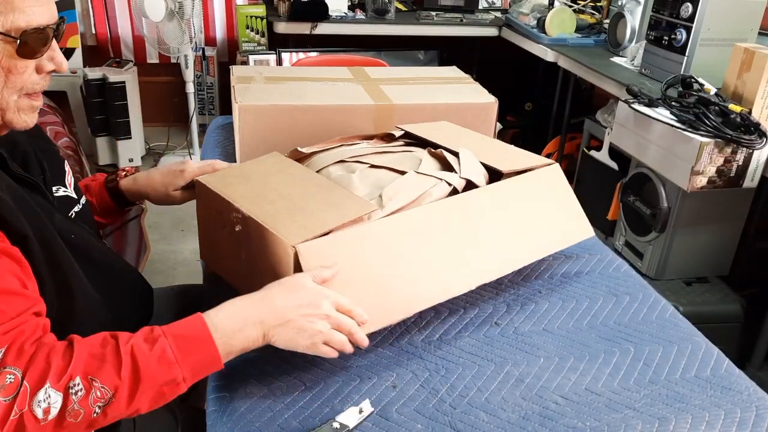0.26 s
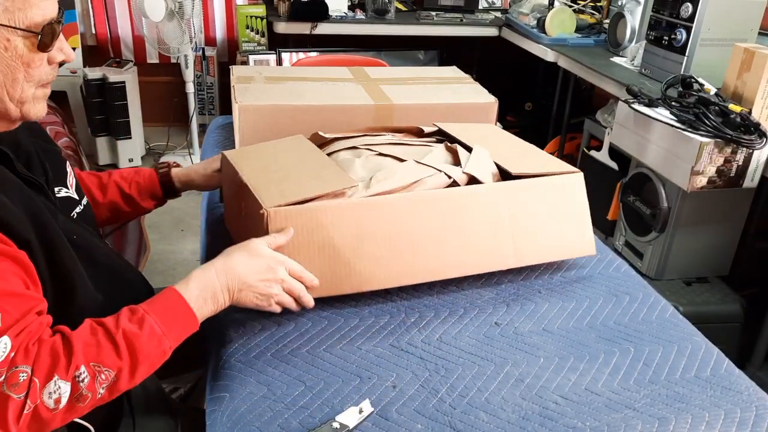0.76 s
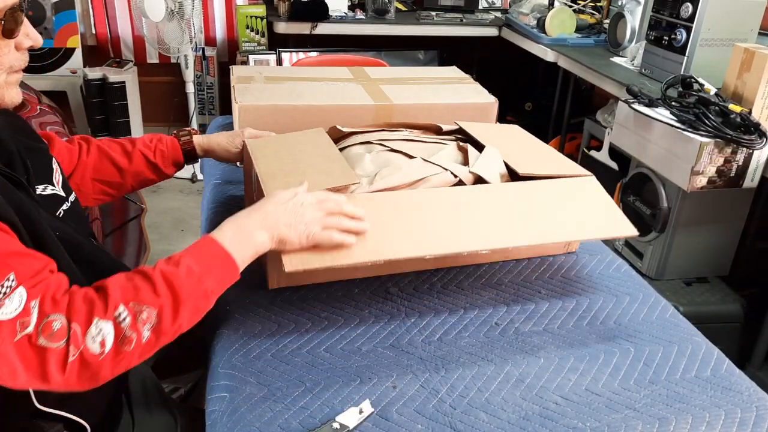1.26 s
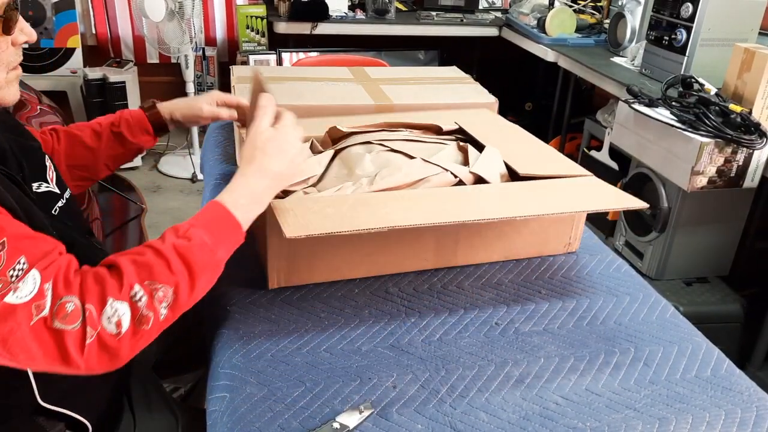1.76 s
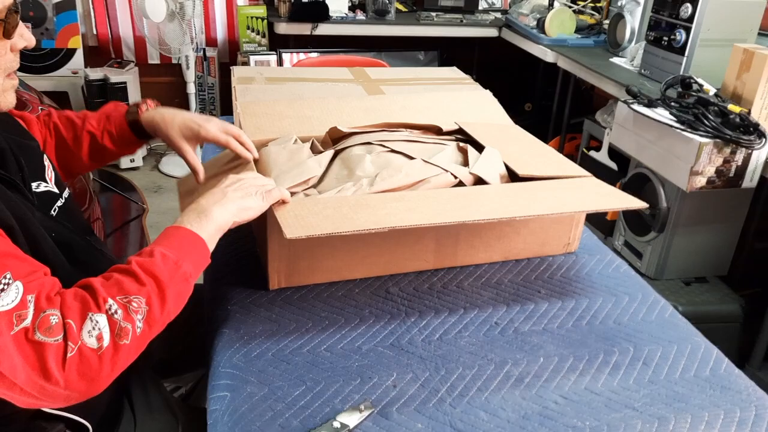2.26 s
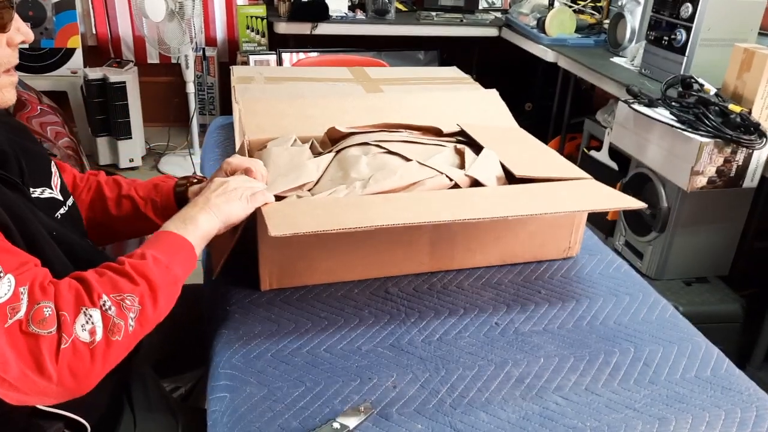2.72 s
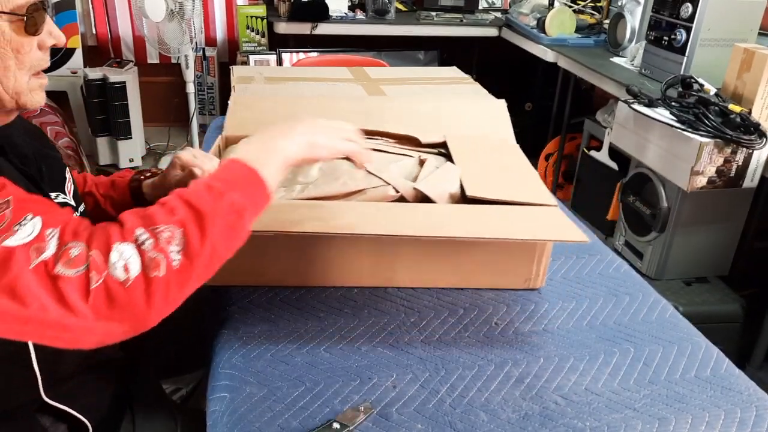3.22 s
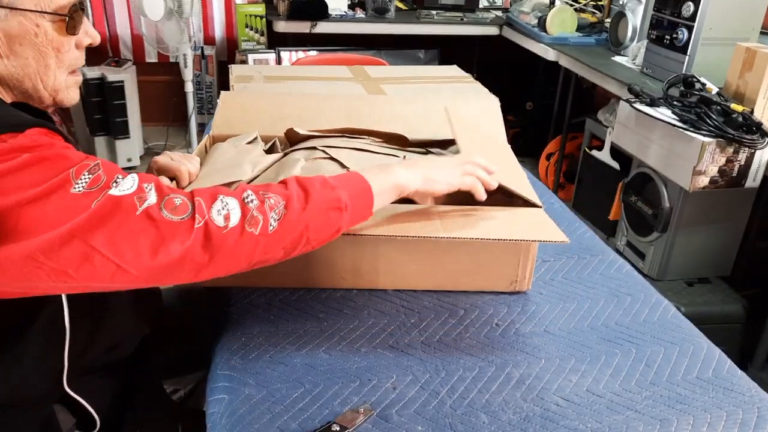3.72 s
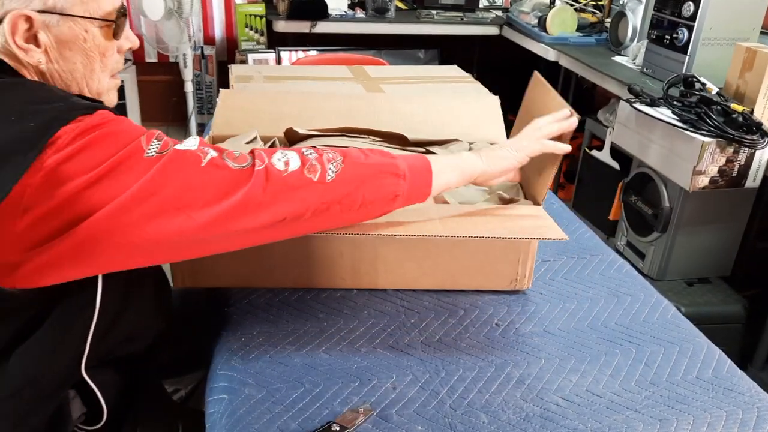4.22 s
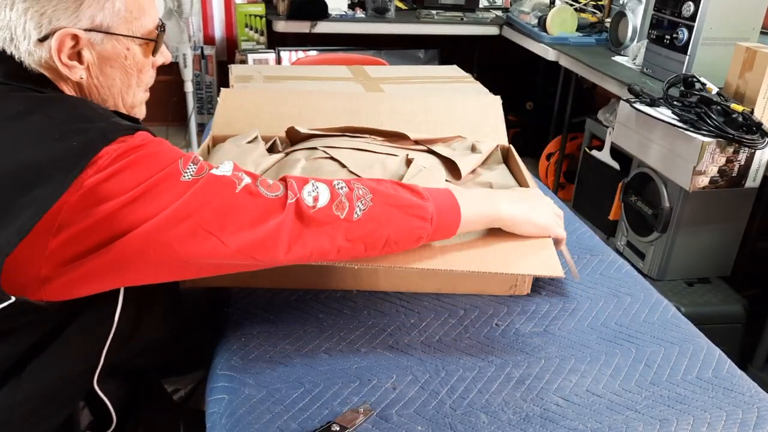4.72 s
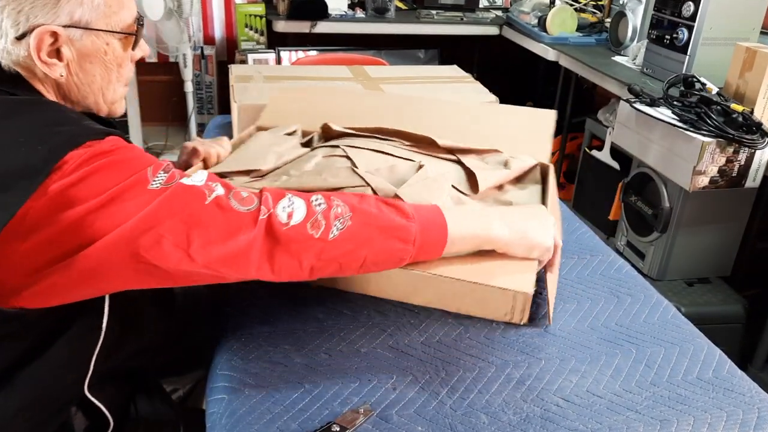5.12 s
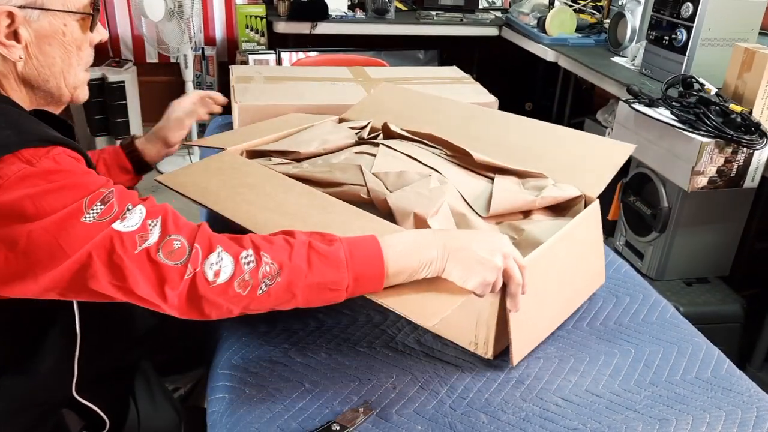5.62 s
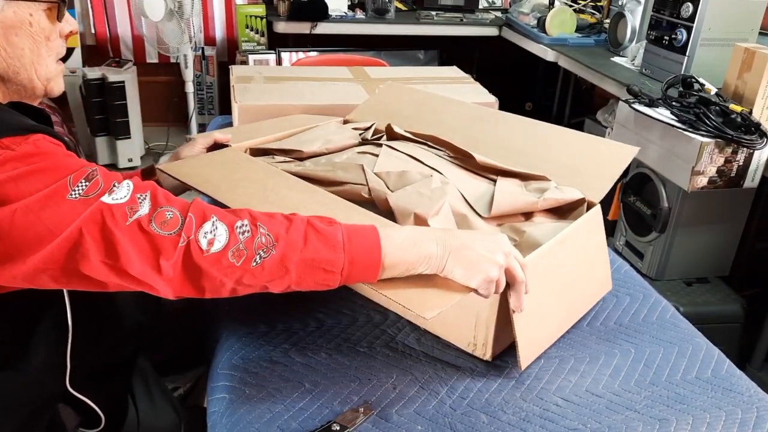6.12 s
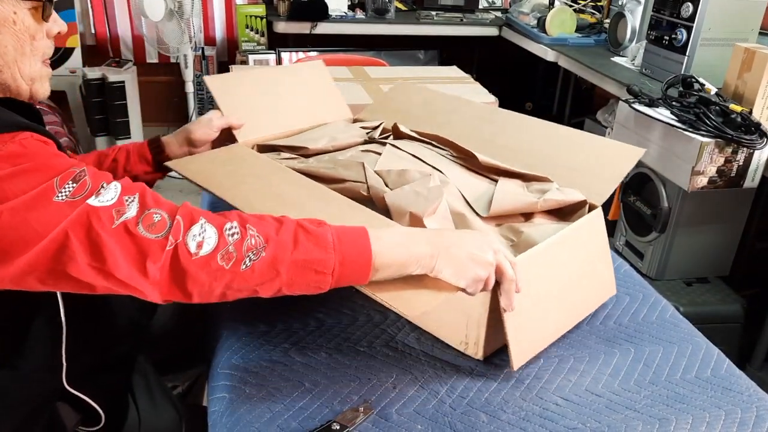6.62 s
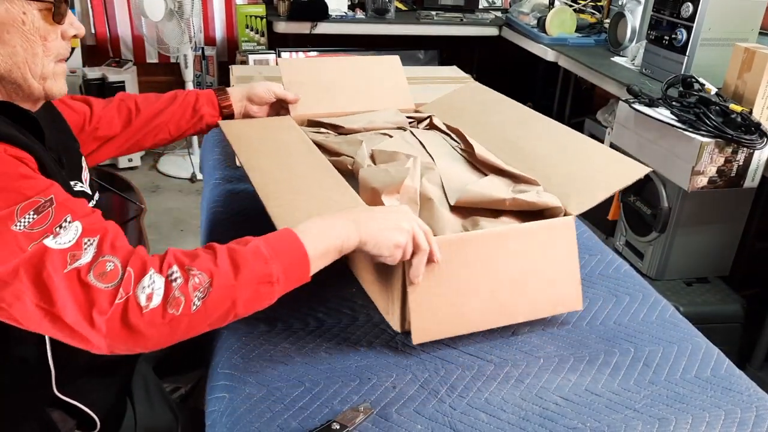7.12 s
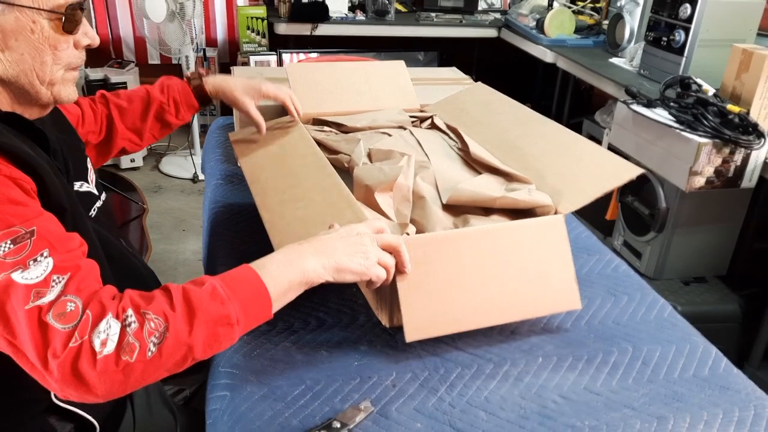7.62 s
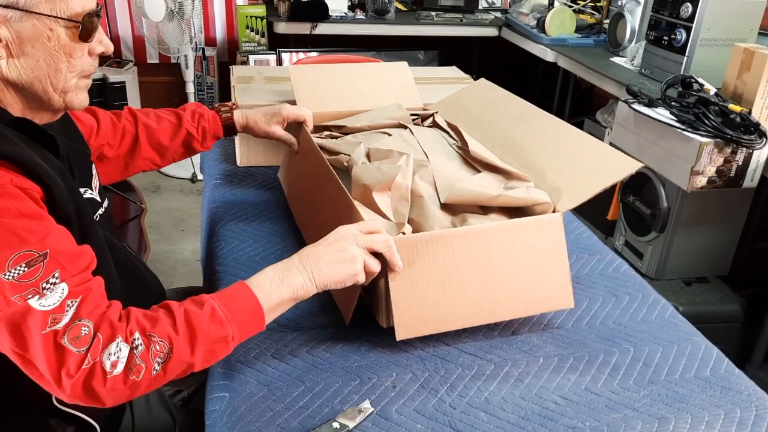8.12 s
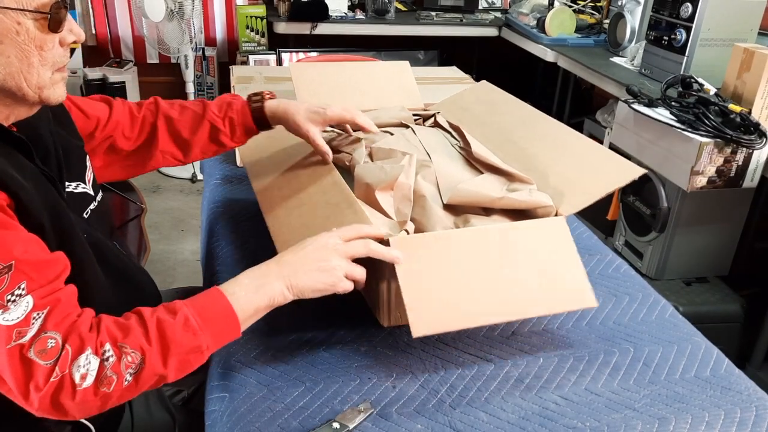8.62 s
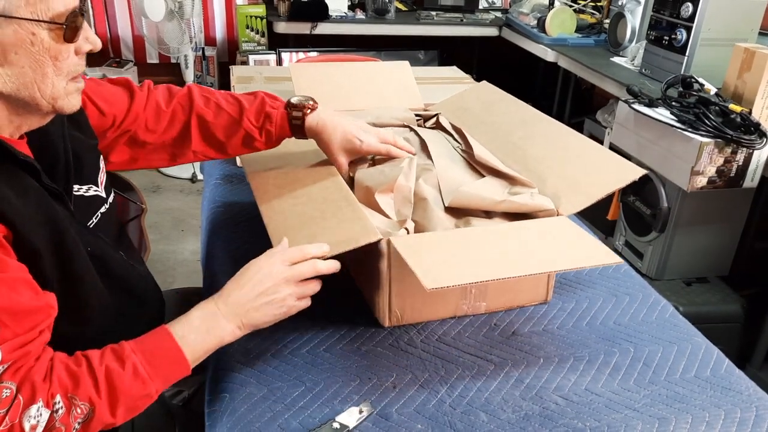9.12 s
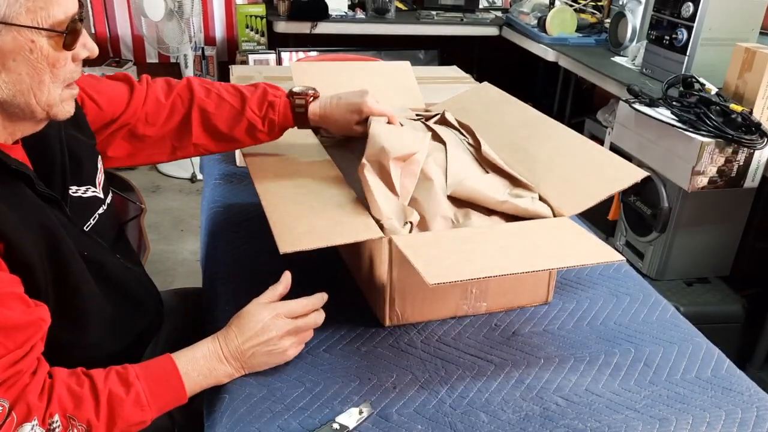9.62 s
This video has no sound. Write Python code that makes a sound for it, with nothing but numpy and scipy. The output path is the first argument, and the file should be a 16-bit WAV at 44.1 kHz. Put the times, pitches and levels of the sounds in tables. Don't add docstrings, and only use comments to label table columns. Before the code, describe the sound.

Grainy cardboard scuffs and soft hollow bumps lead to a single loud knock midway, then crisp crumpled-paper rustling at the end.

```python
import sys
import numpy as np
from scipy import signal
from scipy.fft import rfft, irfft, next_fast_len
from scipy.io import wavfile
from scipy.ndimage import uniform_filter1d

SR = 44100
rng = np.random.default_rng(int(sys.argv[2]) if len(sys.argv) > 2 else 0)


def gain_from_db(level_db):
    decades = np.asarray(level_db, float) / 20
    return 10 ** decades


def file_out(sig):
    cols = np.atleast_2d(sig).T
    lim = np.clip(cols, -1, 1)
    pcm = np.round(lim * 32767).astype(np.int16)
    wavfile.write(sys.argv[1], SR, pcm)


N = 434826
T = np.arange(N) / SR
COARSE = np.arange(0, N / SR + .01, .004)

# pitch_hz, level_db, t60_s (time to fade by 60 dB)
CAVITY = [(291, 4.5, 0.077), (328, 12.5, 0.035), (402, 5.5, 0.0087)]


def on_log(table, hz):
    table = np.array(table)
    return np.interp(np.log(hz), np.log(table[:, 0]), table[:, 1])


def band(x, hz, octaves):
    size = next_fast_len(x.shape[-1])
    f = np.maximum(np.fft.rfftfreq(size, 1 / SR), 1)
    bell = np.exp(-2 * (np.log2(f / hz) / octaves) ** 2)
    return irfft(rfft(x, size) * bell, size)[..., :x.shape[-1]]


def unit(x):
    return x / np.sqrt(np.mean(x ** 2))


def walk(rate):
    k = int(SR / rate)
    levels = np.repeat(rng.standard_normal(N // k + 1), k)
    return uniform_filter1d(uniform_filter1d(levels, k), k)[:N]


def alike(pair, hz):
    # pitch_hz, left-right correlation (0 to 1)
    likeness = [(100, 0.85), (400, 0.89), (700, 0.6), (1500, 0.24), (4000, 0), (12000, 0.)]
    c = np.clip(on_log(likeness, hz), 0, 1)
    middle, side = np.sqrt((1 + c) / 2) * pair[0], np.sqrt((1 - c) / 2) * pair[1]
    return middle + side * np.array([[1], [-1]])


def ring(modes, sign=1):
    t = T[:SR // 2]
    y = 0
    for k, (hz, db, t60) in enumerate(modes):
        y = y + sign ** k * gain_from_db(db - 60 * t / t60) * np.sin(2 * np.pi * hz * t)
    return y / np.abs(y).max()


def strokes(rows, release_db_per_s):
    start, length, db, swell_db = np.transpose(rows)[:, :, None]
    db = db + swell_db * np.clip((COARSE - start) / length, 0, 1)
    db = db - 900 * np.maximum(start - COARSE, 0)
    db = db - release_db_per_s * np.maximum(COARSE - start - length, 0)
    return gain_from_db(2 * db).sum(axis=0)


def handling():
    # start_s, length_s, level_db, swell_db (change over the stroke)
    drags = [(.0, 0.43, -67, 8), (0.46, 0.43, -67, 4), (0.76, 0.42, -64, 12.5), (1.12, 0.48, -59, -4.5),
             (2.016, 0.19, -60, -4.5), (2.282, 0.11, -64, 14), (2.41, 0.58, -56.5, -5),
             (2.908, 0.53, -53, -17), (3.542, 0.084, -65, 7), (4.083, .03, -68, 1),
             (4.158, 0.24, -61.5, -4.5), (4.449, 0.045, -59, 12.5), (4.54, 0.6, -58, 5),
             (5.046, 0.33, -58.5, 10), (5.466, 0.27, -52, -2.5), (5.99, 0.13, -71, 19.5),
             (6.17, 0.028, -53, 6), (6.278, 0.046, -47.5, 9.5), (6.464, 0.814, -59.5, 2.5),
             (7.297, 0.12, -64, 3), (7.46, 0.038, -61.5, 13), (7.53, 0.16, -68, -3),
             (7.687, .09, -56.5, -3), (7.875, 0.12, -54.5, -3.5), (8.043, 0.1, -67.5, 6.5),
             (8.323, 0.059, -59.5, 14), (8.59, 0.092, -66, 6.5)]
    slides = [(0.0, 0.028, -59, -3), (0.05, 0.51, -68, -0.5), (0.609, 0.31, -70, 4), (0.977, 0.13, -62, 5),
              (1.152, 0.45, -50.5, -2), (1.688, 0.37, -67.5, -0.5), (1.94, 0.095, -63.5, 13),
              (2.064, 0.15, -54, -6.5), (2.28, 0.12, -64.5, 10.5), (2.395, 0.26, -58.5, 3.5),
              (2.808, .09, -71, 13), (2.903, 0.5, -53, -19), (3.499, 0.27, -64, -8), (3.818, 0.16, -69, 0),
              (4.057, 0.09, -67, -4), (4.17, 0.015, -60.5, 1), (4.23, 0.22, -65.5, 10),
              (4.604, 0.41, -74.5, 13), (5.06, 0.29, -66, 9), (5.47, 0.14, -79, 27.5),
              (5.66, 0.068, -59, -3), (5.974, 0.27, -65.5, 6.5), (6.277, 0.048, -52.5, 11.5),
              (6.51, 0.26, -80.5, 19), (6.778, 0.34, -62, -1), (7.166, 0.21, -67, 13),
              (7.386, 0.12, -55.5, -10), (7.534, 0.16, -79, -11), (7.702, 0.12, -61.5, -3),
              (7.825, 0.041, -58.5, 2.5), (8.335, 0.042, -57.5, 0.5), (9.756, 0.047, -53.5, 11),
              (8.87, 0.079, -57.5, 0), (9.118, 0.027, -56, -2), (9.25, 0.032, -53, 2),
              (9.358, .07, -53, -5), (8.638, 0.062, -64.5, 7)]
    rustles = [(0.096, 0.86, -93, 20), (1.125, 0.081, -59, -10), (1.198, 0.042, -66, 12),
               (1.267, 0.33, -53, -6), (1.986, 0.33, -70.5, 1), (2.264, 0.23, -61.5, 3.5),
               (2.518, 0.31, -53.5, -12), (2.915, 0.67, -61.5, -19.5), (3.553, 0.07, -68.5, 13),
               (4.31, 0.19, -74.5, 10.5), (4.607, 0.64, -67, 2.5), (5.055, 0.36, -59.5, 7.5),
               (5.301, 0.1, -43, -14), (5.449, 0.22, -60, -2.5), (6.066, 0.15, -82, 18.5),
               (6.284, 0.13, -66, 9.5), (7.204, 0.29, -67, 13), (7.46, 0.034, -52.5, 1),
               (7.535, 0.11, -66.5, -2), (7.844, 0.077, -56, 2), (8.332, 0.066, -67.5, 14.5),
               (8.637, 0.1, -76, 18)]
    pulls = [
        (8.711, 0.02, -45.5, -2),
        (8.818, 0.077, -46, 0.5),
        (8.916, 0.58, -55, 9.5),
        (9.2, 0.14, -46.5, 1.5),
        (9.345, 0.23, -41.5, -2),
        (9.565, 0.19, -42, 0),
        (9.773, 0.14, -43, 5),
    ]
    wobbles = [(0.827, 0.28, -61, 5), (1.412, 0.19, -70, 11.5), (2.302, 0.4, -55.5, -2),
               (3.644, 0.079, -41.5, -13.5), (3.807, 0.21, -60, 0), (4.057, 0.23, -51, -9),
               (4.522, 0.62, -54, 1.5), (5.48, 0.19, -56, 7), (5.972, 0.18, -63.5, 20.5),
               (6.123, 0.087, -52.5, -11), (6.376, 0.45, -55, -15.5), (6.96, 0.43, -89.5, 39.5),
               (7.68, 0.27, -52.5, -2.5)]
    brushes = [
        (1.724, 0.18, -70, 9),
        (3.499, 0.066, -67.5, 14),
        (8.44, 0.13, -54.5, -12),
    ]
    releases = (155, 256, 197.6, 199, 150.4, 150)
    kinds = zip((drags, slides, rustles, pulls, wobbles, brushes), releases)
    return np.array([strokes(rows, release) for rows, release in kinds])


def rubbing():
    # time_s, spread_db (of grain sizes)
    crinkle = [
        (0, -2.5),
        (8.6, -7.5),
        (8.8, 1.5),
        (9.86, 4),
    ]
    # pitch_hz, level_db (per Hz)
    rub_colour = [(231, -14.5), (337, -7), (529, -7.5), (1520, -11.5), (3930, -19), (12100, -17),
                  (14800, 9), (16000, -53.5)]
    rub_hz = (240, 340, 480, 1000, 1800, 3000, 5000, 11000)
    stirs = [(-4, -3, -7.5, -3.5, -5, -7.5, -10, -17), (-20, -28, -34.5, -25.5, -8.5, -4.5, -2, 0),
             (-14.5, -30.5, -14.5, -5.5, -1.5, 4.5, 2.5, -6.5), (-3, 2, -6.5, -4.5, -3.5, -1, -4.5, -15.5),
             (-2.5, 1, -8, -11, -33, -30, -34, -29.5), (-24, -5, -32, -39, -8.5, -4, 2.5, -28)]
    rest_db = -101

    spread_db = np.interp(T, *np.transpose(crinkle))
    sizes = np.minimum(rng.exponential(size=N), 4)
    slips = (rng.random(N) < 900 / SR) * gain_from_db(sizes * spread_db)
    grain = np.sqrt(signal.lfilter([1], [1, -np.exp(-1 / (0.002 * SR))], slips ** 2) + .5)
    grain /= np.sqrt(uniform_filter1d(grain ** 2, SR // 8))
    noise = rng.standard_normal((2, N))
    moving, out = handling(), 0
    for hz in 240 * 2 ** np.arange(0, 6.2, 1 / 3):
        stir_db = np.array([np.interp(np.log(hz), np.log(rub_hz), row) for row in stirs]) - 20
        db = 10 * np.log10(gain_from_db(2 * stir_db) @ moving + gain_from_db(2 * rest_db))
        db = np.interp(T, COARSE, db) + on_log(rub_colour, hz)
        db = db + 10 * np.log10(0.2 * hz) + 3.0 * walk(14)
        pair = unit(band(noise * grain if hz > 500 else noise, hz, .3))
        out = out + gain_from_db(db) * alike(pair, hz)
    return out


def rumble():
    # start_s, length_s, level_db, swell_db
    leans = [
        (4.4, 0.49, -67.5, -7),
        (7.3, 0.14, -62.5, -2),
        (7.66, 0.24, -64.5, -4),
        (8.18, 0.19, -65.5, 0),
        (8.9, 0.83, -75.5, 10),
    ]
    deep_rest_db, panel_rest_db, panel_share_db = -74.5, -78.5, -15.5
    noise = rng.standard_normal((2, N))
    deep = unit(alike(band(noise, 66, 1.0), 70)) * gain_from_db(deep_rest_db)
    lean = np.interp(T, COARSE, np.sqrt(strokes(leans, 65)))
    deep += unit(alike(band(noise[::-1], 77.0, 0.25), 70)) * lean
    scraping = handling()[[0, 3]].sum(axis=0)
    panel = np.sqrt(gain_from_db(2 * panel_rest_db) + gain_from_db(2 * panel_share_db) * scraping)
    return deep + unit(alike(band(noise, 161.0, 0.56), 149)) * np.interp(T, COARSE, panel)


def bumps():
    # time_s, peak_db, table_thud_db,
    # wall_rattle_db (both relative to the peak)
    box_bumps = [(0.055, -63, 9, -19), (0.09, -57, 6, -19), (1.129, -55, 9, 10), (1.171, -46.5, -4, -1),
                 (2.021, -41.5, 3.5, -12), (2.411, -51.5, -8, 12.5), (2.554, -49, -21, 13),
                 (2.622, -51, 0, 2), (2.649, -40.5, -10, 2), (2.908, -43.5, -9, 2.5), (2.982, -50, 0, -9),
                 (3.628, -39, -4, -2), (3.679, -45, -3, 0), (3.78, -46.5, -5, -5), (4.066, -44, -14, -17),
                 (4.162, -49, -4, 4), (4.492, -50.5, -12, 6),
                 (5.299, -45.5, -30, 14.5), (5.465, -36.5, -8, -3.5), (5.584, -52, 2, -1),
                     (6.08, -48.5, -3, 4), (6.3235, 1.5, -26, -25), (6.6, -47, 4, -5),
                     (6.769, -50.5, 3.5, -5), (6.91, -54.5, 3, -14), (7.299, -57, 13.5, -8),
                     (7.697, -38.5, 5.5, -8), (7.848, -43, -28, -13), (7.897, -49.5, -4, -17),
                     (8.373, -50, -29, 11), (8.751, -43.5, -2, -4), (9.129, -54, 2, 5),
                     (9.217, -34, -27, -1), (9.456, -36.5, -8, -3), (9.749, -51, 10, 5)]
    # pitch_hz, level_db, t60_s
    table_modes = [(68, -6, 0.2), (115, -17, 0.032), (149, 8.5, 0.083), (190, -4, 0.25)]
    # pitch_hz, level_db, t60_s
    wall_modes = [(500, -15.5, 0.13), (634, -6, 0.13), (931, 1, 0.03), (1160, -10.5, 0.14),
                  (1700, -12, 0.025), (2150, -13.5, 0.069)]

    s, db, thud_db, wall_db = np.transpose(box_bumps)
    hard = (db > -15).astype(int)
    out, push = 0, np.hanning(int(0.003 * SR))
    parts = ((CAVITY, -1, db, .018), (table_modes, 1, db + thud_db, .02), (wall_modes, -1, db + wall_db, .012))
    for modes, sign, level_db, drag_s in parts:
        taps = np.zeros((2, N))
        taps[hard, (s * SR).astype(int)] = gain_from_db(level_db)
        drag = signal.lfilter([1], [1, -np.exp(-1 / (drag_s * SR))], taps[0]) / np.sqrt(drag_s * SR / 3)
        force = drag * rng.standard_normal(N) + 0.29 * taps[0]
        out = out + signal.fftconvolve(uniform_filter1d(force, size=16), ring(modes, sign=sign))[:N]
        answer = slam() if modes is CAVITY else ring(modes, sign=sign)
        knock = np.convolve(answer, push / push.sum())
        out = out + signal.fftconvolve(taps[1], knock)[:N]
    return signal.sosfilt(signal.butter(2, 55, "highpass", fs=SR, output="sos"), out)


def slam():
    slam_hz, slam_s, tail_db = 345, .021, -11
    skew, point = .95, 1.9
    y = gain_from_db(tail_db) * ring(CAVITY, sign=-0.65)
    k = int(slam_s * SR)
    swell = np.sin(np.pi * (T[:k] / slam_s) ** skew) ** point
    return y + np.pad(swell * np.sin(2 * np.pi * slam_hz * T[:k]), (0, len(y) - k))


def scuffs():
    # start_s, length_s, level_db, swell_db, pitch_hz
    edge_scuffs = [(0.174, 0.33, -73, 0, 1300), (.5, 0.52, -71, 9, 1480), (1.214, 0.064, -63, 6, 1700),
                   (1.227, .1, -59, -6, 2880), (1.312, 0.31, -55.5, -6.5, 1050),
                   (1.352, 0.09, -51, -3, 2450), (1.74, 0.14, -68, 7, 4500), (2.927, 0.035, -55, 2, 2390),
                   (3.157, 0.15, -65, -1, 1010), (5.074, 0.051, -48, -9, 1700), (5.475, .03, -54, -5, 950),
                   (7.472, 0.028, -48, -5, 1160), (7.52, 0.15, -68, 5, 1410), (8.004, 0.14, -73, 6, 1396),
                   (8.744, .03, -44, -8, 1520), (9.216, .03, -43, -11, 1520),
                   (9.755, 0.041, -46, 2.5, 6300), (.985, 0.35, -55, 0, 12500),
                   (6.76, 0.37, -67.5, 1.5, 5600), (8.958, .24, -60, 0, 5000), (9.58, 0.15, -57, 0, 5500),
                   (3.93, .045, -64, 1, 8550), (4.167, 0.018, -54, -2, 8500), (4.28, .19, -67, 5, 8000),
                   (6.278, .065, -50.5, 1.5, 1500), (6.287, 0.046, -53.5, 0, 3000),
                   (5.462, 0.046, -58, -6, 600), (9.522, .012, -45, -9, 1600), (8.744, .01, -46, -13, 3000)]
    noise = rng.standard_normal((2, N)) * gain_from_db(3 * walk(25))
    out = np.zeros((2, N))
    for *stroke, hz in edge_scuffs:
        first = max(int((stroke[0] - .05) * SR), 0)
        part = slice(first, int((stroke[0] + stroke[1] + .25) * SR))
        pair = alike(unit(band(noise[:, part], hz, 0.43)), hz)
        out[:, part] += pair * np.interp(T[part], COARSE, np.sqrt(strokes([stroke], 290)))
    return out


def booms():
    # time_s, peak_db, pitch_hz, t60_s
    box_booms = [(2.019, -64, 330, .15), (3.63, -51, 297, .15), (3.641, -47, 186.5, 0.31),
                 (4.064, -42.5, 329, 0.16), (5.462, -34, 356, 0.1), (6.322, -27.5, 507, 0.0555),
                 (6.327, -25, 139.6, 0.11), (6.339, -23, 366, 0.051), (6.367, -21.5, 327, 0.074),
                 (6.392, -31, 377, 0.057), (6.422, -33.5, 334, 0.063), (6.44, -26.5, 339, 0.032),
                 (6.458, -35, 316, 0.059), (6.478, -50.5, 313, 0.12), (7.7, -49, 140, 0.24),
                 (7.844, -44, 358, .1), (7.89, -47, 362, 0.28), (6.283, -31.5, 978, .07),
                 (6.312, -37, 918, .1), (6.285, -47.5, 3180, .15), (6.3, -53, 1450, .1),
                 (6.305, -52, 2900, .07), (6.312, -46, 2230, .07), (7.686, -48, 70, 0.28),
                 (7.702, -44, 214, 0.044), (4.487, -49, 371, 0.17), (4.155, -45, 316, 0.24),
                 (5.452, -44.5, 930, .08), (5.59, -39.5, 363, .07), (8.368, -39.5, 361, 0.2),
                 (9.211, -45, 345, 0.088)]
    swell_s = .012
    out, t = np.zeros(N + SR // 2), T[:SR // 2]
    for s, db, hz, t60 in box_booms:
        i = int(s * SR)
        swell = np.minimum(t / swell_s, 1)
        fade = gain_from_db(db - 60 * np.maximum(t - swell_s, 0) / t60)
        out[i:i + len(t)] += swell * fade * np.sin(2 * np.pi * hz * t)
    return out[:N]


def snaps(rows):
    lead = 256
    paper_start_s, paper_room_db = 8.71, -3
    out, t = np.zeros((3, N + 2048)), T[:1024 - lead]
    shape = (1 - np.exp(-t / .0003)) * np.exp(-t / .0013)
    for s, db, hz, edge_db, pan_db in rows:
        paper = s >= paper_start_s
        burst = rng.standard_normal((3, len(t))) * shape
        burst = np.array([burst[0] + .5 * burst[1], burst[0] + .5 * burst[2], t == 0])
        burst = np.pad(burst, ((0, 0), (lead, 0)))
        sheet = band(burst, hz, 1.04) + gain_from_db(-0.5) * band(burst, 1800, 1.65 if paper else 1.3)
        edge = gain_from_db(-8 if paper else -16) * band(burst, 5500, 0.67)
        edge = edge + gain_from_db(edge_db - 7.0) * band(burst, 7000, 2.4)
        tick = sheet + edge * np.array([[1], [1], [.45]])
        tick[:, :lead] *= np.exp(-T[lead:0:-1] / .0002)
        tick /= np.sqrt(np.sum(tick ** 2, axis=1)[:, None])
        level_db = db + 14.0 + np.array([[pan_db], [-pan_db], [2 * paper_room_db * paper]]) / 2
        i = int(s * SR) - lead
        out[:, i:i + tick.shape[1]] += tick * gain_from_db(level_db)
    return out[:2, :N], out[2, :N]


def creases():
    # time_s, peak_db, ring_hz, bright_edge_db, left_minus_right_db
    card_snaps = [(2.5523, -29.5, 2780, -40, 7), (2.558, -28, 1200, -49, 2), (2.6324, -33, 1350, -30, 3),
                  (2.661, -26, 1220, -44, 6), (2.667, -35, 2040, -42, 9), (2.904, -39, 1500, -20, 2),
                  (2.9469, -39.5, 2420, -18, 1), (3.6257, -37, 1070, -23, 1), (4.057, -71, 900, -18, -2),
                  (4.169, -59, 902, 29, -3), (5.0726, -31, 1750, 5, -1), (5.1142, -37, 1470, -16, 1),
                  (5.122, -38, 1500, -25, 7), (5.2972, -21.5, 1460, -1, 2), (5.3028, -25, 1440, -30, 2),
                  (5.312, -27, 1480, -33, 1), (5.46, -40, 900, -30, -1), (6.265, -44, 974, -9.5, -4)]
    paper_folds = [(8.7108, -39, 740, -22, 0), (8.739, -19, 730, -1.5, -1), (8.824, -27, 3240, -13, 1),
                   (8.8775, -28, 1990, 6, 0), (9.0169, -33, 960, -27, 2), (9.1223, -29, 1280, -12, 2),
                   (9.1806, -46, 4500, -13, -1), (9.212, -31.5, 1750, -40, -2), (9.253, -22, 1950, 4.5, 1),
                   (9.3194, -46, 900, -30, 1), (9.344, -49, 1730, -20, -1), (9.3572, -20.5, 915, 13, 3),
                   (9.366, -31, 2500, -10, 1), (9.4547, -31.5, 2150, -29, -1), (9.485, -29.5, 2330, -21, 1),
                   (9.5138, -21.5, 1490, -15, 2), (9.52, -25, 1500, -40, 2), (9.5617, -16.5, 2130, -2, 1),
                   (9.569, -38, 1810, -22, 1), (9.624, -33, 3000, -24, 3), (9.639, -24, 1930, -25, 1),
                   (9.6413, -30, 4500, -25, 1), (9.6558, -19.5, 1970, -6.5, 2), (9.702, -31, 4500, -18, -1),
                   (9.741, -23, 1720, -25, 3), (9.7436, -27.5, 3970, -22, -4), (9.816, -37, 9000, 8, 3),
                   (9.8465, -24.5, 2800, -19, 0)]
    splinters = [(2.6615, -35, 4500, -25, 0), (3.628, -39, 3500, -15, 1), (5.4605, -44, 950, -30, 1),
                 (8.327, -51.5, 2500, -5, 3), (8.7425, -27, 2500, -20, 6), (9.257, -26, 4000, -13, 1),
                 (9.363, -34, 11000, 10, 1), (9.517, -28, 1600, -30, -2), (9.5645, -25, 5000, -15, 1),
                 (9.853, -32, 1500, -25, 1)]
    crease, scattered = snaps(card_snaps + paper_folds)
    splinter, scattered_again = snaps(splinters)
    answer = room(scattered, wet_db=3.0) + room(scattered_again, wet_db=-1.5)
    return crease + splinter, answer


def creak():
    # time_s, cavity_hum_db, wall_creak_db
    grind = [
        (6.26, -78, -77.5),
        (6.264, -41.5, -40),
        (6.29, -30.5, -40),
        (6.302, -35, -32.5),
        (6.312, -23.5, -40.5),
        (6.325, -39.5, -30.5),
        (6.345, -64, -45),
        (6.42, -77.5, -51.5),
        (6.46, -122, -57),
    ]
    # pitch_hz, level_db, pitch_waver (share of the pitch)
    creak_modes = [(960, -5.5, 0.027), (525, -11.5, 0.054), (1200, -13.5, 0.041), (1720, -8.5, 0.018),
                   (2196, -9, 0.016), (2940, -18, 0.048)]
    s, hum_db, wall_db = np.transpose(grind)

    def tone(hz, waver):
        phase = 2 * np.pi * np.cumsum(hz * (1 + waver * walk(150))) / SR
        return np.sqrt(2) * np.sin(phase)

    wall = sum(gain_from_db(db + 4 * walk(120)) * tone(hz, waver) for hz, db, waver in creak_modes)
    hum = tone(345, 0.065) * gain_from_db(np.interp(T, s, hum_db, -200, -200))
    return hum + wall * gain_from_db(np.interp(T, s, wall_db, -200, -200))


def room(x, wet_db):
    # pitch_hz, t60_s
    room_t60 = [(150, 0.96), (500, 0.5), (1500, 0.21), (4000, 0.46), (10000, 0.41)]
    t = T[:SR // 2]
    noise = rng.standard_normal((2, len(t)))
    tail = 0
    for hz in 125 * 2. ** np.arange(8):
        tail = tail + alike(band(noise, hz, 1), hz) * gain_from_db(-60 * t / on_log(room_t60, hz))
    tail *= (1 - np.exp(-t / 0.0034)) * (1 + 1.0 * np.exp(-t / 0.0087))
    tail /= np.sqrt(np.mean(np.sum(tail ** 2, axis=1)))
    return gain_from_db(wet_db) * signal.fftconvolve(np.atleast_2d(x), tail, axes=1)[:, :N]


def scene():
    left_db, blow_left_db, blow_lag_s = 2.0, -0.6, 0.00016
    crease, crease_room = creases()
    blow = bumps() + booms() + creak()
    sides = np.array([blow * gain_from_db(blow_left_db), np.interp(T - blow_lag_s, T, blow)])
    near = rubbing() + rumble() + sides + scuffs()
    near = near + crease_room + room(blow, wet_db=-21)
    return crease + near * gain_from_db(np.array([[left_db], [-left_db]]) / 2)


def top_cut(x):
    return signal.sosfilt(signal.butter(12, 17000, fs=SR, output="sos"), x)


def record(dry):
    hiss_db, top_hz = -84, 15860
    x = dry + gain_from_db(hiss_db) * rng.standard_normal(dry.shape)
    x = signal.sosfilt(signal.butter(2, 45, "highpass", fs=SR, output="sos"), x)
    x = signal.sosfilt(signal.ellip(10, .2, 50, top_hz, fs=SR, output="sos"), x)
    return top_cut(x)


dry = scene()
out = record(dry)
file_out(out)
```